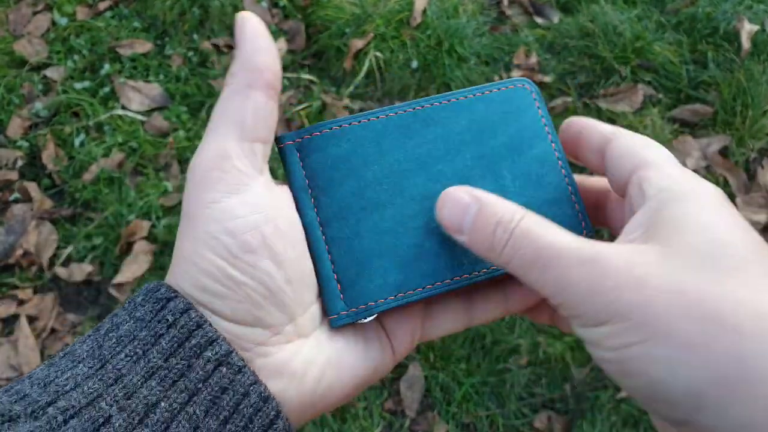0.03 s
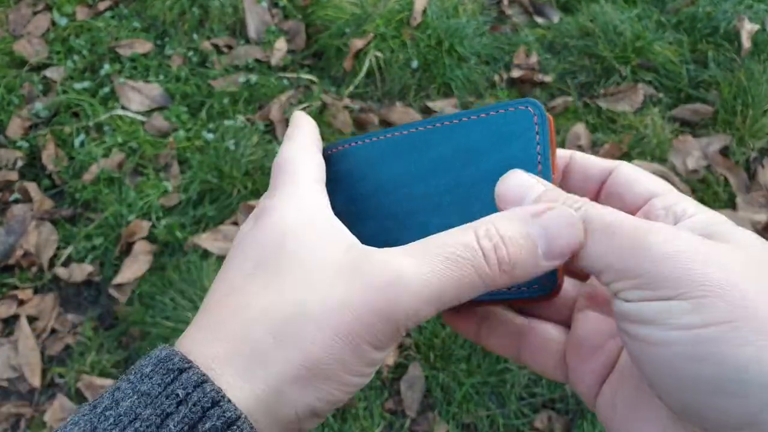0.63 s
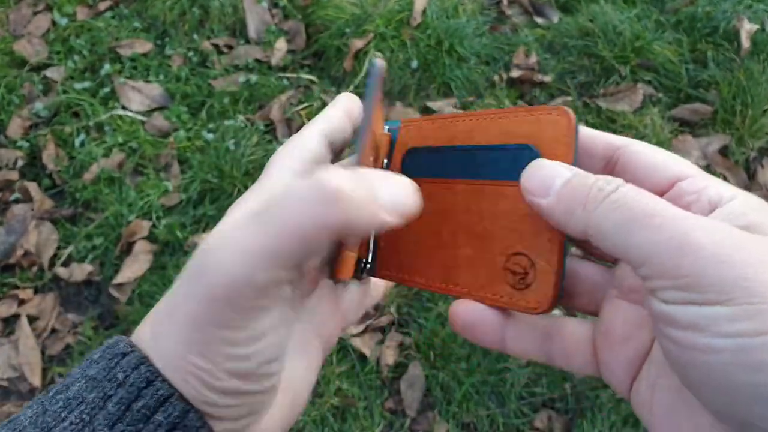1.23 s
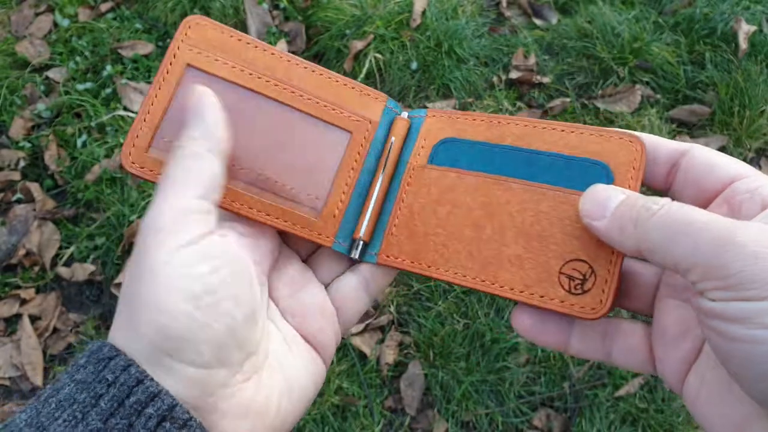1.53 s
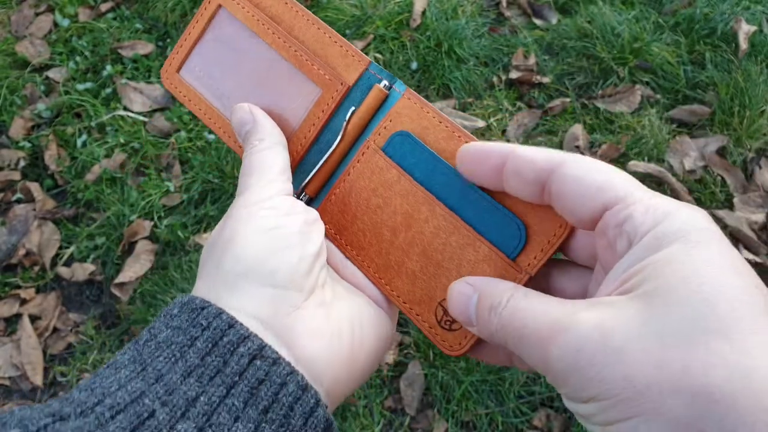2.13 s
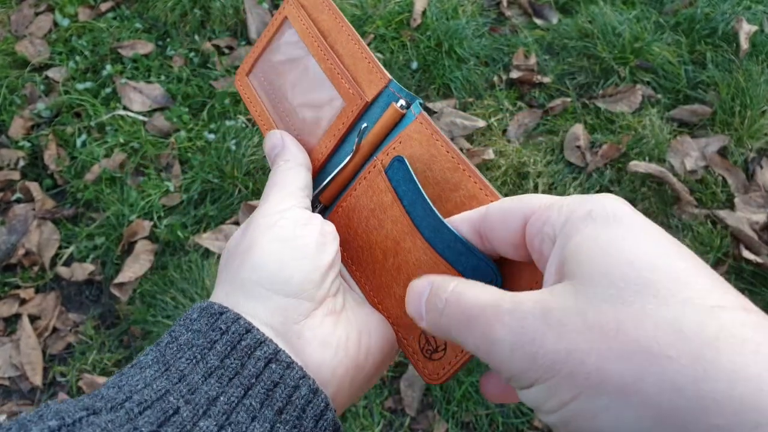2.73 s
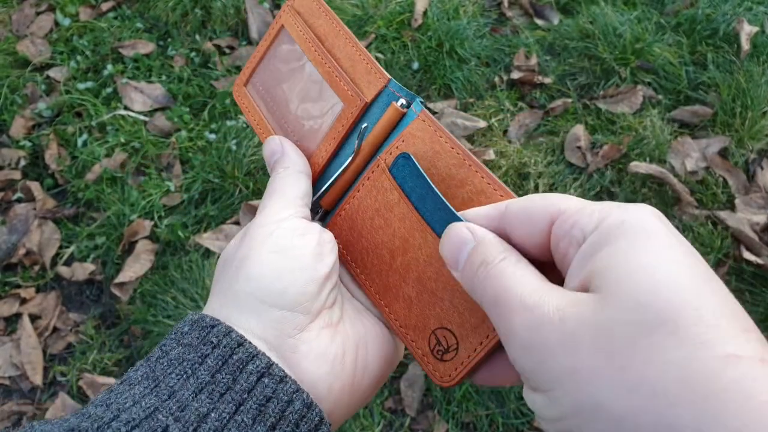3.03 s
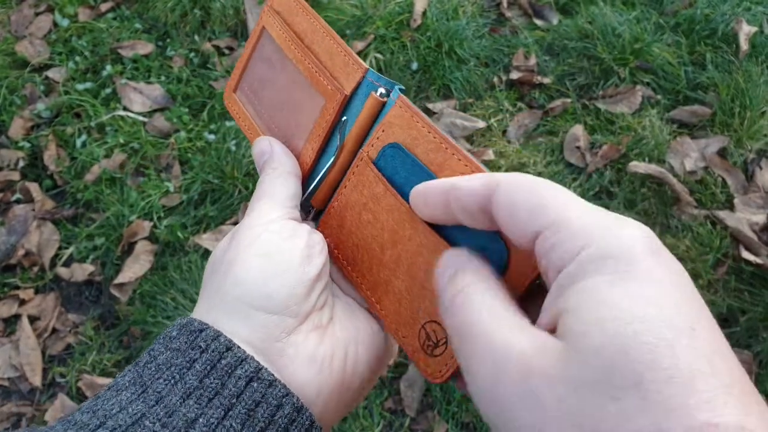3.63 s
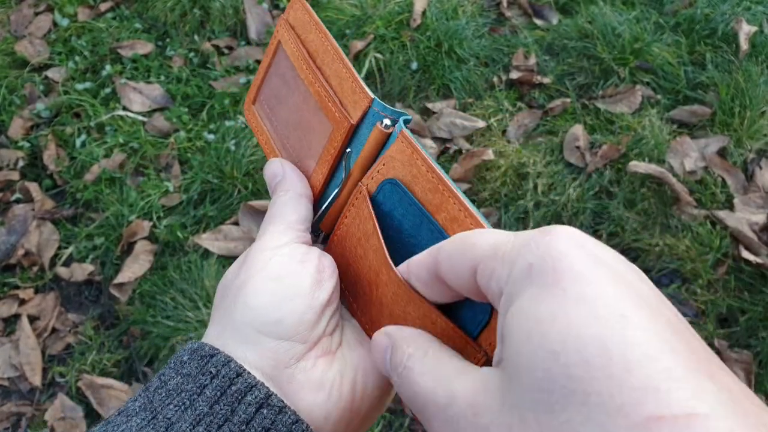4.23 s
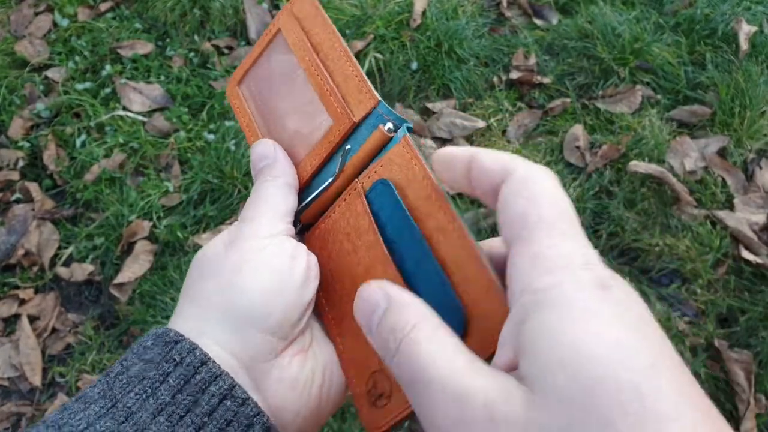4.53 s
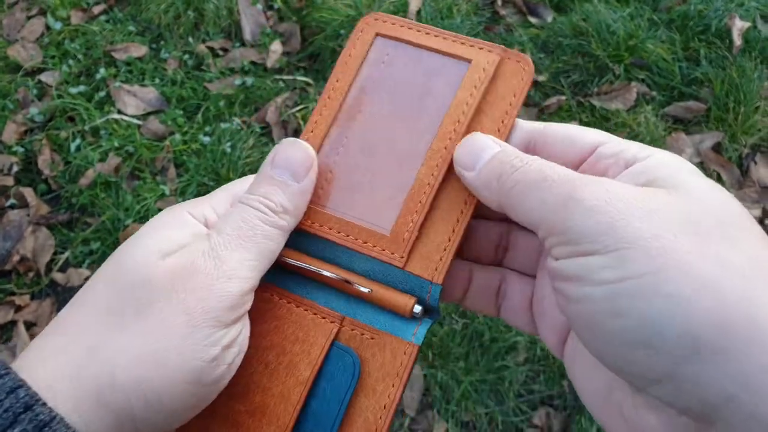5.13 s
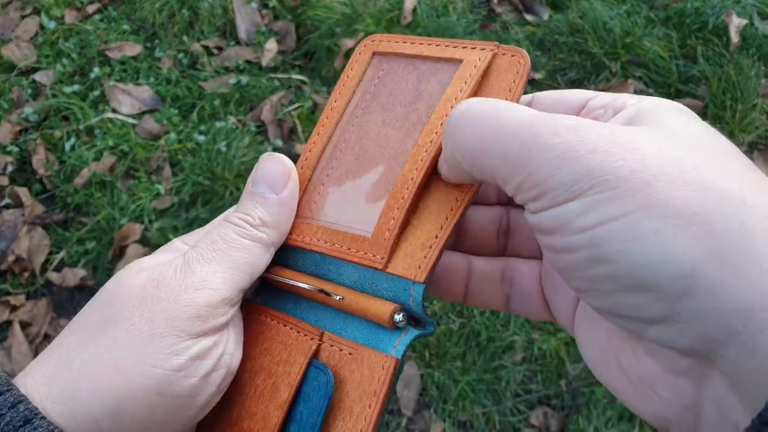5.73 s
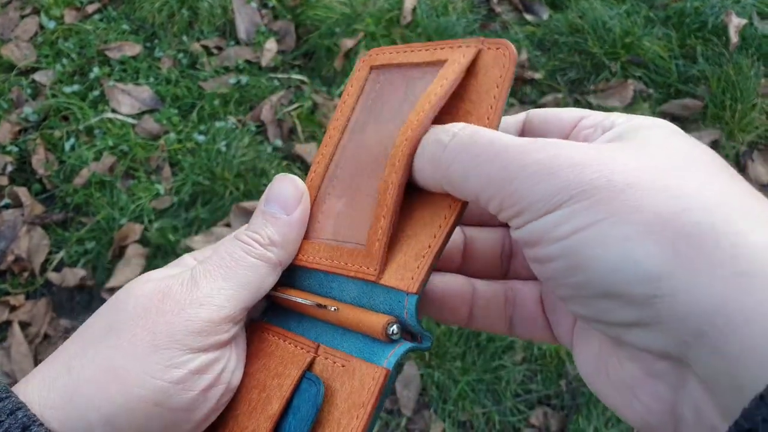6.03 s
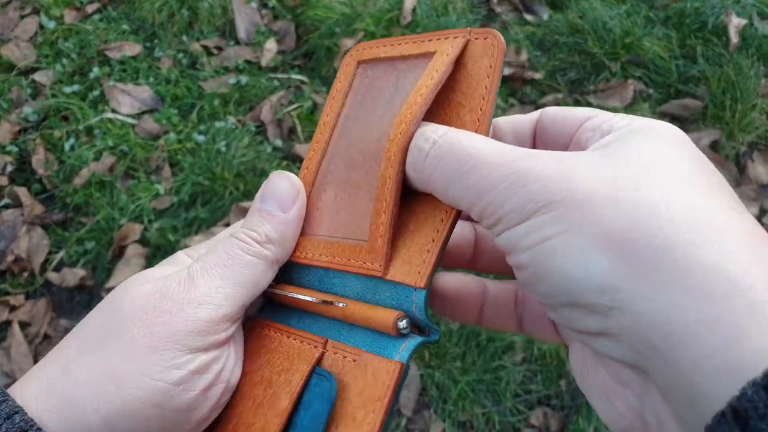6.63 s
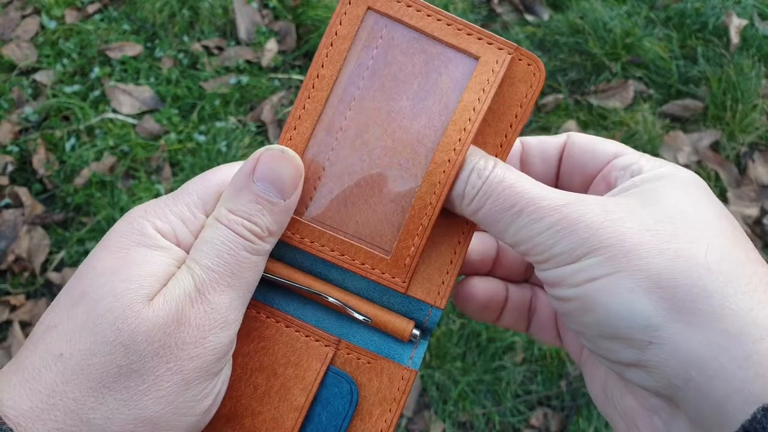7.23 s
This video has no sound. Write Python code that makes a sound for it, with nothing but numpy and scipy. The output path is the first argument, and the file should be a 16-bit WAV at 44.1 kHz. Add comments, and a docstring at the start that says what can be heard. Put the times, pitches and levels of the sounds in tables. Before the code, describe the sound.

Outdoors, with no echo, distant traffic rumbles steadily while hands handle a leather wallet close to the microphone. The handling is quiet: dry skin slides and soft leather rustles, with small crisp ticks at about 0.3, 0.9 and 1.6 seconds as the wallet is turned and opened. Leather rubs and a fingernail scrapes around 1.9 and 2.4 seconds, with another rub at 3.4. From 4 to 4.6 seconds come light scrapes and ticks at a card pocket, then more near 5.8 to 6, and a soft rub at 7. Light wind buffets the microphone with low thumps, switching between left and right, strongest at 2.4 to 2.8 and 4 to 5.7 seconds. A far engine drone swells gently around 1, 4 and 6.5 seconds. A faint hiss of leaves slowly grows, and one tiny distant chirp sounds near 6.9 seconds.

```python
"""Hands rub and turn a leather wallet, close by on a lawn, over the low rumble of far traffic.
They open it and pry at the card pockets: skin slides on smooth leather, layers of leather rub,
a nail scrapes, and seams and the money clip tick. Light wind buffets the two microphone ports
in turn with low thumps. Behind lie an engine drone, faint leaves and one distant chirp."""
import sys
import numpy as np
from scipy import signal
from scipy.fft import rfft, irfft
from scipy.io import wavfile
from scipy.ndimage import uniform_filter1d, map_coordinates

SR = 44100
rng = np.random.default_rng(int(sys.argv[2]) if len(sys.argv) > 2 else 0)


def unload_audio(sound):
    """Save the sound as a 16-bit wav file, at the path given as the first command line argument."""
    columns = np.transpose(np.atleast_2d(sound))
    # keep every value between -1 and 1, then stretch to whole-number steps
    steps = np.round(np.clip(columns, -1, 1) * 32767)
    wavfile.write(sys.argv[1], SR, steps.astype(np.int16))


N = 321930
TIME = np.arange(N) / SR
FREQ = np.maximum(np.fft.rfftfreq(N, 1 / SR), 1)
SIDES = np.array([[1], [-1]])   # left, right


def from_db(db):
    """Decibels to gain."""
    return 10 ** (np.asarray(db) / 20)


def rms_one(x):
    """Scale to rms 1."""
    return x / np.sqrt(np.mean(x ** 2) + 1e-20)


def in_time(rows):
    """Each column of an automation curve at every sample."""
    s, *columns = np.transpose(rows)
    return [np.interp(TIME, s, c) for c in columns]


def over_hz(points):
    """Join points on a log-frequency axis."""
    hz, value = np.transpose(points)
    return np.interp(np.log(FREQ), np.log(hz), value)


def shaped(x, colour):
    """EQ noise to a colour, rolling off beyond its ends; rms 1."""
    ends = (1 + (colour[0][0] / FREQ) ** 4) * (1 + (FREQ / colour[-1][0] / 2) ** 4)
    return rms_one(irfft(rfft(x) * from_db(over_hz(colour)) / np.sqrt(ends), N))


def pan(balance_db):
    """Constant-power gains for a pan given as left minus right in dB."""
    gains = from_db(SIDES * balance_db / 2)
    return gains / np.sqrt(np.mean(gains ** 2, axis=0))


def drift(per_s):
    """A smooth random wander of rms 1."""
    knots = rng.standard_normal(4000)
    coarse = TIME[::32]
    curve = map_coordinates(knots, [coarse * per_s], order=2, mode="wrap")
    return np.interp(TIME, coarse, rms_one(curve))


def swell(s, length):
    """A short bell-shaped rise and fall around time s."""
    return np.exp(-2 * np.minimum(((TIME - s) / length) ** 2, 20))


def bell_db(s, rise_s, fall_s, edge_db=6.5, shape=1.55):
    """A lopsided fade in and out, edge_db down at rise_s and fall_s; shape 2 is round, 1 pointed."""
    away = np.abs(TIME - s) / np.where(TIME < s, rise_s, fall_s)
    return -edge_db * np.minimum(away, 10) ** shape


def ring(x, hz, width_hz):
    """Pass twice through one damped resonance; rms 1."""
    r = np.exp(-np.pi * width_hz / SR)
    b = np.array([1, 0, -1]) * (1 - r * r) / 2
    a = [1, -2 * r * np.cos(2 * np.pi * hz / SR), r * r]
    return rms_one(signal.lfilter(b, a, signal.lfilter(b, a, x)))


# Stereo width of the background. Each row: frequency in Hz, coherence between the ports.
COHERENCE = [(40, 0.4), (130, 0.89), (290, 0.86), (640, 0.062), (1000, -0.47), (1400, -0.25), (2200, 0.36),
             (3100, -0.11), (6000, -0.00063)]

def diffuse():
    """Noise from all around: alike at both ports in the bass, unrelated in the treble."""
    mid, side = rfft(rng.standard_normal((2, N)))
    alike = over_hz(COHERENCE)
    return irfft(np.sqrt(1 + alike) * mid + np.sqrt(1 - alike) * side * SIDES, N)


# Colour of the noise floor. Each row: frequency in Hz, EQ in dB.
HISS_EQ = [(100, -2), (2500, -2), (4000, -10), (5600, -11), (6600, 2.5), (7500, 3.5), (9000, -1.5),
           (15500, 1)]

def microphone_hiss(level_db):
    """Each microphone adds its own steady hiss."""
    return from_db(level_db) * shaped(rng.standard_normal((2, N)), HISS_EQ)


# The stir of the foliage. Each row: time in seconds, relative level in dB.
LEAF_LEVELS = [(0, -81), (.6, -86), (1.1, -77), (2.2, -70), (2.9, -73), (4.5, -66), (5.5, -66),
               (7.3, -61.5)]
# Its colour. Each row: frequency in Hz, EQ in dB.
LEAF_EQ = [(1200, 2), (2300, 9.5), (3300, 2), (4900, -10.5), (6200, -6.5), (7400, -5.5), (9000, -3.5),
           (11000, -7.5), (15500, -19)]

def leaves(gain_db):
    """Stirring grass and leaves hiss faintly, toward the right."""
    stir_db, = in_time(LEAF_LEVELS)
    return shaped(diffuse(), LEAF_EQ) * from_db(stir_db + gain_db) * pan(-6.5)


def far_air(x, fading_db, fades_per_s, bands):
    """Moving air makes each band of a distant sound fade in and out on its own."""
    place = np.interp(np.log(FREQ), np.log([400, 2600]), [0, bands - 1])
    spectrum, out = rfft(x), 0
    for k in range(bands):
        band = irfft(spectrum * np.maximum(1 - np.abs(place - k), 0), N)
        out += band * from_db(fading_db * np.tanh(drift(fades_per_s)))
    return out


# The traffic bed. Each row: time in seconds, relative levels of rumble and of tyres in dB.
TRAFFIC_LEVELS = [(0, -51.5, -51.5), (.3, -52.5, -53), (.75, -51.5, -50), (1, -53, -51), (1.5, -49, -50.5),
                  (2.1, -51.5, -51.5), (3.2, -49, -50.5), (3.7, -50, -52), (4.5, -48.5, -50.5),
                  (5.6, -48.5, -51.5), (6.1, -49.5, -51.5), (6.6, -49, -50), (7.3, -47.5, -50)]
# Brighter tyre hiss as cars come and go. Each row: time in seconds, level in dB.
PASSING_LEVELS = [(0, -63), (.45, -57.5), (.75, -56.5), (1.1, -60), (1.5, -57), (2, -66), (2.9, -64),
                  (3.6, -59.5), (4.2, -59), (5.45, -71), (5.9, -59), (7.3, -67.5)]
# Colours of these three layers. Each row: frequency in Hz, EQ in dB.
RUMBLE_EQ = [(20, -5), (45, 1.5), (75, 4.5), (100, -6), (125, 2), (160, -6), (205, -5.5), (300, -13),
             (450, -18), (700, -27.5), (1500, -45.5)]
TYRE_EQ = [(250, -22.5), (450, 1), (700, -0.5), (1000, 2.5), (1400, -3.5), (2000, -11), (2600, -16.5),
           (3400, -23.5), (5000, -26)]
PASSING_EQ = [(1000, -10.5), (1500, 2.5), (2000, -5), (2500, -10), (3100, -17), (4200, -18.5)]

def traffic(rumble_gain_db, tyre_gain_db):
    """The town rumbles, and tyre noise carries from a distant road through moving air."""
    rumble_db, tyre_db = in_time(TRAFFIC_LEVELS)
    passing_db, = in_time(PASSING_LEVELS)
    rumble = shaped(diffuse(), RUMBLE_EQ) * from_db(rumble_db + rumble_gain_db)
    tyres = shaped(diffuse(), TYRE_EQ) * from_db(tyre_db + tyre_gain_db)
    passing = shaped(diffuse(), PASSING_EQ) * from_db(passing_db)
    road = far_air(tyres + passing, fading_db=2.05, fades_per_s=8, bands=10)
    return rumble * pan(-0.97) + road * pan(-1.97)


# The engine's note. Each row: time in seconds, pitch in Hz.
ENGINE_PITCH = [(0, 87.6), (.65, 92.05), (1.1, 99.8), (1.5, 102.2), (2.1, 82), (3.5, 79), (5.2, 80.6),
                (5.9, 83.6), (6.35, 92.1), (6.65, 92.5), (7.3, 86)]
# Its swells under load. Each row: peak time, rise and fall in seconds, relative level in dB,
# second harmonic in dB against the first.
ENGINE_LOADS = [(.8, 0.29, 1, -41, -12), (4.1, 0.38, 0.6, -40.5, -1.5), (6.45, 0.14, .45, -34.5, -22)]

def engine(gain_db, waver_db):
    """A far exhaust note swells and fades, unsteady after its long way through the air."""
    hz, = in_time(ENGINE_PITCH)
    phase = 2 * np.pi * np.cumsum(hz + 1.6 * drift(10)) / SR
    note = 0
    for s, rise_s, fall_s, level_db, overtone_db in ENGINE_LOADS:
        tone = np.sin(phase) + from_db(overtone_db) * np.sin(2 * phase)
        note += tone * from_db(level_db + bell_db(s, rise_s, fall_s))
    return note * from_db(gain_db + waver_db * drift(13))


# One faint chirp: midpoint and length in seconds, pitch in Hz, level in dB.
FAR_CHIRP = (6.875, .035, 1865, -55)

def chirp():
    """A short, slightly unsteady whistle far away."""
    s, length, hz, level_db = FAR_CHIRP
    phase = 2 * np.pi * np.cumsum(hz + 20 * drift(80)) / SR
    return np.sin(phase) * swell(s, length) * from_db(level_db)


# Gusts, each favouring one port. Each row: start and hold in seconds, relative level and pan in dB.
WIND_GUSTS = [(0.478, 0.079, -41, 17), (1.247, 0.08, -35, -16), (1.433, 0.019, -35.5, -24),
              (1.83, 0.099, -37.5, -21), (2.288, 0.033, -43, 3), (2.378, 0.06, -41, -20),
              (2.47, 0.14, -29, -19), (2.72, 0.085, -37, 8), (2.77, 0.37, -40, -4),
              (3.432, 0.017, -34, -26), (4.053, 0.14, -34, 13), (4.475, 0.02, -36, 14),
              (4.566, 0.034, -30.5, 20), (4.619, 0.088, -31, -11), (4.951, 0.16, -31, 22),
              (5.091, 0.123, -37.5, -14), (5.413, 0.16, -31, -17), (5.669, 0.026, -34.5, -16),
              (6.227, 0.078, -47, 10), (6.685, 0.017, -34, -27), (6.89, 0.23, -39.5, -24),
              (7.12, 0.039, -41, 19), (7.196, 0.072, -35.5, -21)]

def gusting(breeze_db=-58.5, attack_s=0.018, release_s=0.026):
    """Wind strength at each port: every gust rises quickly, holds and dies back into the breeze."""
    power = from_db(breeze_db) ** 2
    for s, hold_s, level_db, balance_db in WIND_GUSTS:
        outside = np.maximum((s - TIME) / attack_s, (TIME - s - hold_s) / release_s)
        envelope = np.exp(-np.clip(outside, 0, 20))
        power = power + (envelope * from_db(level_db) * pan(balance_db)) ** 2
    return np.sqrt(power)


# Colour of the buffeting. Each row: frequency in Hz, EQ in dB.
WIND_EQ = [(20, -39), (35, -3), (60, 6), (100, 5), (150, -5.5), (220, -11.5), (300, -26), (450, -48),
           (800, -40)]
# The strongest eddies, heard as thumps. Each row: midpoint in seconds, relative level in dB,
# pitch in Hz, pan in dB, core in dB against the swing.
EDDY_THUMPS = [(0.521, -21.5, 60, 12, -22), (0.771, -18.5, 95, 18, -26), (1.256, -15.5, 135, -22, -16),
               (1.294, -18, 94, -22, -22), (1.456, -20, 110, -22, -18), (1.849, -20, 99.5, -22, -25),
               (1.912, -16, 118, -24, -22), (2.397, -18, 87, -22, -22), (2.431, -10.5, 86.5, -24, -24),
               (2.447, -18, 82, -22, -20), (2.494, -14, 78.4, -24, -11), (2.517, -6.5, 92, -36, -10.5),
               (2.532, -10.5, 97, -26, -17), (2.55, -14.5, 108, -24, -17), (2.604, -12.5, 115, -21, -12),
               (2.648, -8, 76, -22, -8.5), (2.741, -6, 84, 28, -13), (3.439, -21, 89, -24, -22),
               (4.07, -14, 124, 22, -20), (4.114, -12, 80, 19, -20), (4.149, -14, 80, 24, -4),
               (4.187, -17.5, 129, 20, -19), (4.479, -20, 93, 18, -18), (4.569, -12.5, 98, 22, -20),
               (4.591, -14, 122, 22, -19), (4.645, -9.5, 130, -31, -9.5), (4.655, -9.5, 165, -31, -22),
               (4.673, -15.5, 130, -24, -11), (4.887, -17.5, 73.6, 20, -16), (4.922, -7, 117, 30, -12),
               (4.954, -15, 88, 22, -20), (4.971, -14, 128, 22, -20), (4.991, -15.5, 128, 22, -14),
               (5.047, -11, 106, 24, -11), (5.071, -11, 96, 24, -9), (5.083, -12.5, 113, 25, -9),
               (5.099, -12.5, 114, 17, -15), (5.197, -20.5, 101, -18, -22), (5.415, -13, 94.5, -24, -9),
               (5.451, -10.5, 129, -23, -22), (5.482, -12.5, 115, -21, -11.5), (5.506, -11, 110, -29, -6),
               (5.552, -11, 123, -20, -13), (5.571, -12, 150, -21, -7.5), (5.687, -17, 118, -24, -10),
               (6.05, -26, 95, 14, -16), (6.238, -21, 200, 27, -13), (6.252, -20.5, 58, 22, -22),
               (6.294, -20, 68, 14, -26), (6.31, -17, 77.5, 16, -26), (6.702, -16.5, 130, -31, -28),
               (6.948, -20.5, 78, -22, -22), (7.034, -17, 85, -18, -26), (7.141, -19, 71, 21, -25),
               (7.272, -16.5, 99, -16, -21.5)]

def wind(gust_db, flutter_db, eddy_db, eddy_cycles, core_ratio, levelling_s):
    """Each port has its own turbulence; an eddy sweeps it aside with a pressure swing and tight core."""
    flow = shaped(rng.standard_normal((2, N)), WIND_EQ)
    # Even out the noise so that the gusts set its dynamics.
    flow /= np.sqrt(uniform_filter1d(flow ** 2, int(levelling_s * SR)) + 1e-6)
    out = flow * gusting() * from_db(gust_db + flutter_db * drift(35))
    for s, level_db, hz, balance_db, core_db in EDDY_THUMPS:
        near = slice(int((s - .05) * SR), int((s + .05) * SR))
        cycles = (TIME[near] - s) * hz
        blend = np.exp(-(cycles / eddy_cycles) ** 2) * pan(balance_db) / np.sqrt(2)
        swing, core = np.cos(2 * np.pi * (np.outer([1, core_ratio], cycles) + rng.random((2, 1))))
        eddy = from_db(level_db + eddy_db) * (swing + from_db(core_db) * blend * core)
        out[:, near] += blend * (eddy - out[:, near])
    return out


# A fingernail on the pocket edges. Each row: midpoint and length in seconds, level in dB,
# ring pitch and bandwidth in Hz, pan in dB.
NAIL_SCRAPES = [(0.285, .03, -64, 7800, 800, -2), (0.715, .04, -66, 7500, 1200, -2),
                (1.472, 0.027, -61, 7100, 1700, -1), (1.865, .04, -58, 7000, 1800, -2),
                (1.915, 0.04, -57, 6100, 2400, -3), (2.182, .025, -59, 6500, 3800, 0),
                (2.38, .05, -68, 6200, 2200, 0), (2.45, .025, -63, 7000, 1800, 0),
                (3.662, 0.013, -67, 7500, 900, -1), (3.956, 0.08, -71, 5000, 3300, 3),
                (4.01, 0.11, -62, 10600, 2300, 9), (4.28, 0.02, -61.5, 5930, 1200, 4),
                (4.313, 0.033, -65, 4500, 2400, 2), (4.394, .02, -62, 5140, 3800, 2),
                (4.484, .014, -61, 5800, 3200, -1), (5.758, 0.02, -57.5, 4670, 2700, 3),
                (5.957, 0.04, -56, 5400, 3400, 0), (5.964, 0.022, -57, 2500, 2100, -1),
                (6.04, .04, -64, 5000, 3800, 3)]

def scrapes(judder_db):
    """A nail sticks and slips along a stiff edge, which rings at a pitch of its own."""
    slipping = rng.standard_normal((2, N)) * from_db(judder_db * drift(300))
    out = np.zeros((2, N))
    for s, length, level_db, hz, width_hz, balance_db in NAIL_SCRAPES:
        near = np.abs(TIME - s) < 2 * length
        ringing = ring(slipping[:, near], hz, width_hz)
        out[:, near] += ringing * swell(s, length)[near] * from_db(level_db) * pan(balance_db)
    return out


# Seams and money clip ticking. Each row: start in seconds, relative peak and pan in dB,
# ring pitch and bandwidth in Hz, crack in dB against the ring.
EDGE_TICKS = [(0.1532, -48, -4, 6900, 4000, -14), (0.332, -37.5, -1, 1900, 1100, -4),
              (0.917, -38, 0, 1890, 800, -7.5), (1.549, -42.5, -1, 5800, 3400, -12),
              (1.5503, -41, 4, 10000, 7000, -8), (1.6467, -42, 5, 10000, 7000, -8),
              (3.198, -56, -2, 5000, 3500, -12), (4.2418, -49, -4, 7500, 3980, -3),
              (4.3852, -47, 4, 12000, 7000, -5), (4.494, -40, 6, 13100, 8000, -10),
              (4.599, -48, 5, 5400, 4000, -14), (5.012, -53, 3, 7000, 4000, -18),
              (5.1895, -50, 5, 7000, 2500, -18), (5.7667, -47, 0, 4000, 3200, -12)]

def ticks(gain_db, t60_s, snap):
    """A caught edge lets go: a crisp crack and a few milliseconds of ringing chatter."""
    out, age = np.zeros((2, N)), TIME[:2000]
    for s, peak_db, balance_db, hz, width_hz, crack_db in EDGE_TICKS:
        burst = rng.standard_normal((2, len(age))) * from_db(-60 * age / t60_s)
        burst[:, 0] = snap
        tick = ring(burst, hz, width_hz) + from_db(crack_db) * rms_one(burst)
        tick /= np.abs(tick).max(axis=1, keepdims=True)
        start = round(s * SR)
        out[:, start:start + len(age)] += tick * from_db(peak_db + gain_db) * pan(balance_db)
    return out


# The hands turn the wallet, fold it open, pry at a card pocket, shift grip and try the window pocket.
# Each row: fastest moment, speed-up and slow-down in seconds, then relative skin level,
# relative leather level, leather pan and skin brightness in dB.
HAND_STROKES = [(0, .05, 0.045, -62, -59.5, -3, -3), (.18, 0.093, 0.08, -68, -64.5, -3, 0),
                (.38, 0.23, 0.19, -85.5, -60.5, -5, 0), (.58, 0.097, 0.064, -57, -71, 1, 4),
                (.75, 0.14, 0.11, -69, -60, -2.5, 10), (1, 0.26, 0.46, -92, -70, -11, 0),
                (1.5, 0.17, 0.15, -65.5, -67, -8, 0), (1.86, 0.2, 0.17, -58, -58.5, -3, 2),
                (1.92, 0.099, 0.045, -68, -56.5, -9, -2), (2.25, 0.33, 0.28, -61, -81, 0, 4.5),
                (2.41, 0.078, 0.14, -67, -58, -1, 4), (2.61, 0.074, 0.093, -66.5, -63.5, -1, 12),
                (3.21, 0.11, 0.087, -77, -64, -4, 0), (3.375, 0.073, 0.055, -59, -56, -3, 1),
                (3.67, 0.066, 0.1, -78, -65, -1, -4), (3.93, 0.07, 0.098, -72, -65.5, 0, -9),
                (4.04, 0.11, 0.1, -65.5, -66.5, 0, -9), (4.279, 0.027, 0.061, -84, -62.5, -3, 0),
                (4.47, 0.048, 0.04, -59, -60, -1, -2), (4.489, 0.024, 0.009, -47.5, -66, -1, 6),
                (4.63, 0.12, 0.21, -78, -68, 7, -1), (4.92, 0.4, 0.22, -62.5, -62.5, -2, 3),
                (5.231, 0.17, 0.19, -83, -63.5, 0, 0), (5.79, 0.04, 0.13, -72, -65, 0, -4),
                (5.96, 0.024, 0.025, -59, -55, 3, -1), (6.01, .13, 0.13, -77, -62.5, -4, 0),
                (6.96, 0.17, 0.096, -66, -67, -3, 0), (7.25, .15, .2, -76, -78, -2, -4)]

def strokes(resting_skin_db=-79.5, resting_leather_db=-86):
    """Overlapping strokes add in power, and the hands never lie quite still; four curves in dB."""
    sliding, rubbing, brightness = from_db(resting_skin_db) ** 2, from_db(resting_leather_db) ** 2, 0
    for s, rise_s, fall_s, skin_db, leather_db, balance_db, bright_db in HAND_STROKES:
        power = from_db(2 * bell_db(s, rise_s, fall_s))
        glide = power * from_db(skin_db) ** 2
        sliding = sliding + glide
        brightness = brightness + glide * bright_db
        rubbing = rubbing + power * (from_db(leather_db) * pan(balance_db)) ** 2
    place_db = 10 * np.log10(rubbing[0] / rubbing[1])
    return 10 * np.log10(sliding), brightness / sliding, 10 * np.log10(rubbing.mean(axis=0)), place_db


def friction(level_db, slips_per_s, spread_db, hiss):
    """Countless tiny slips of the grain over a smooth hiss; faster strokes slip more often."""
    speed = from_db((level_db - level_db.max()) / 2)
    slips = rng.random((2, N)) < slips_per_s * speed / SR
    sizes = from_db(spread_db * np.minimum(rng.exponential(1, (2, N)), 4))
    signs = rng.choice([-1, 1], (2, N))
    return rms_one(slips * sizes * signs / np.sqrt(speed)) + hiss * rng.standard_normal((2, N))


# Colour of leather on leather. Each row: frequency in Hz, EQ in dB.
LEATHER_EQ = [(900, -4), (2000, 4.5), (3500, -0.5), (5000, -1), (7200, -1), (9000, -3), (12000, -2.5),
              (15500, -5.5)]
# Its lean to the left port. Each row: frequency in Hz, pan in dB.
LEATHER_PAN = [(2000, 2.5), (7000, 0), (9500, 6), (15000, 3)]

def leather(level_db, place_db, gain_db, judder_db):
    """The fibrous inner faces rub with a coarse rustle."""
    grain = shaped(friction(level_db, slips_per_s=9000, spread_db=4.0, hiss=0.98), LEATHER_EQ)
    stroke = grain * from_db(level_db + gain_db + judder_db * drift(80)) * pan(place_db)
    return irfft(rfft(stroke) * pan(over_hz(LEATHER_PAN)), N)


# Colour of skin on the smooth face. Each row: frequency in Hz, EQ in dB.
SKIN_EQ = [(2500, -33), (4000, -9), (6000, -9), (7500, -7.5), (9000, -3.5), (11500, -2), (15500, -3)]
# The left port hears it brighter. Each row: frequency in Hz, pan in dB.
SKIN_PAN = [(3000, -3), (7000, 2), (9500, 12), (15000, 18)]

def skin(level_db, bright_db, gain_db, judder_db, pivot_hz, wander_db):
    """Dry fingertips glide with a fine, very bright crackle whose colour shifts with the grip."""
    grain = rfft(shaped(friction(level_db, slips_per_s=4000, spread_db=0.0, hiss=1.0), SKIN_EQ))
    upper = 1 / (1 + (pivot_hz / FREQ) ** 8)
    tilt = from_db((bright_db + wander_db * drift(14)) / 2)
    tilted = irfft(grain * upper, N) * tilt + irfft(grain * (1 - upper), N) / tilt
    stroke = tilted * from_db(level_db + gain_db + judder_db * drift(60))
    return irfft(rfft(stroke) * pan(over_hz(SKIN_PAN)), N)


def scene():
    """The wallet close by, in open air without echoes."""
    skin_db, bright_db, leather_db, place_db = strokes()
    wallet = skin(skin_db, bright_db, gain_db=7.0, judder_db=1.0, pivot_hz=11600, wander_db=4.0)
    wallet += leather(leather_db, place_db, gain_db=3.0, judder_db=1.06)
    wallet += ticks(gain_db=2.0, t60_s=0.011, snap=1.7) + scrapes(judder_db=2.5)
    air = wind(gust_db=1.0, flutter_db=1.5, eddy_db=-5.0, eddy_cycles=0.54, core_ratio=2.17,
               levelling_s=0.0606)
    bed = traffic(rumble_gain_db=8.0, tyre_gain_db=-0.07) + leaves(gain_db=4.0)
    bed += microphone_hiss(level_db=-68.0) + engine(gain_db=-1.0, waver_db=2.8) + chirp()
    return wallet + air + bed


# A treble shelf on the whole mix. Each row: frequency in Hz, gain in dB.
MASTER_EQ = [(7700, -1.5), (8250, -9.5), (15500, -9)]

def record(dry, cutoff_hz=15850):
    """The top octave is shelved down and cut steeply."""
    cut = 1 / np.sqrt(1 + (FREQ / cutoff_hz) ** 240)
    return irfft(rfft(dry) * from_db(over_hz(MASTER_EQ)) * cut, N)


dry = scene()
out = record(dry)
unload_audio(out)
```